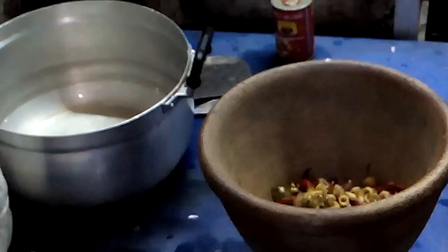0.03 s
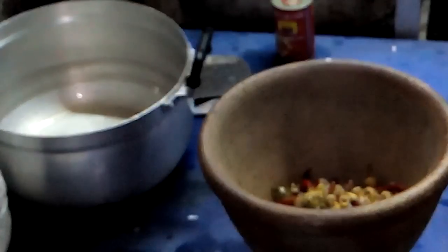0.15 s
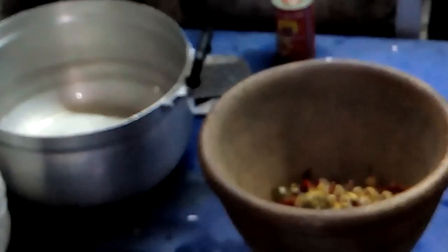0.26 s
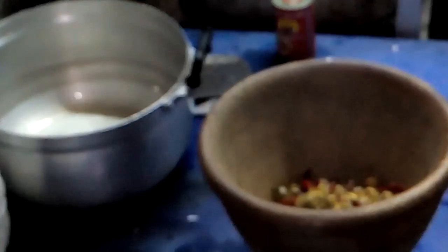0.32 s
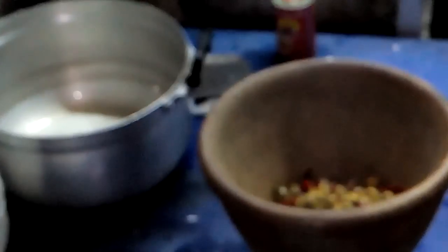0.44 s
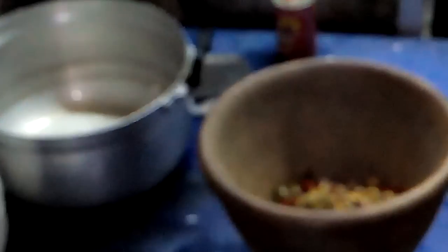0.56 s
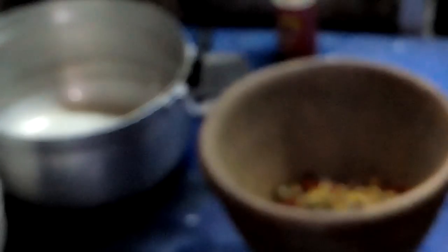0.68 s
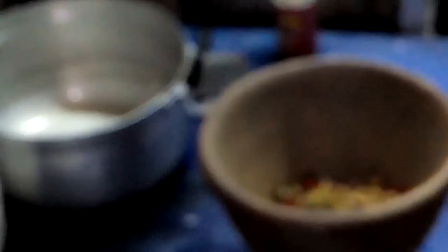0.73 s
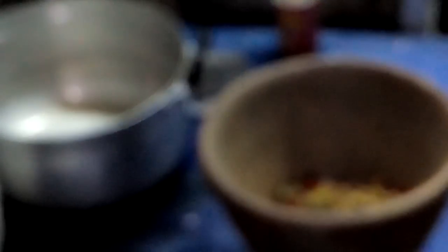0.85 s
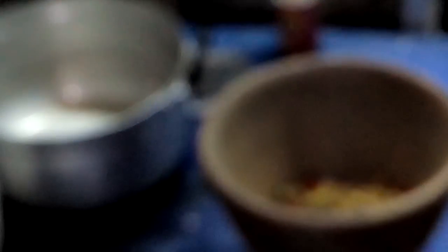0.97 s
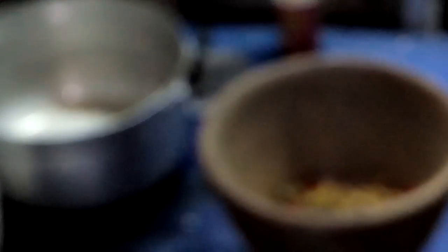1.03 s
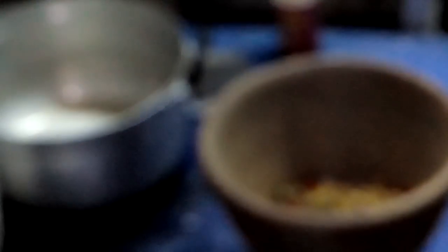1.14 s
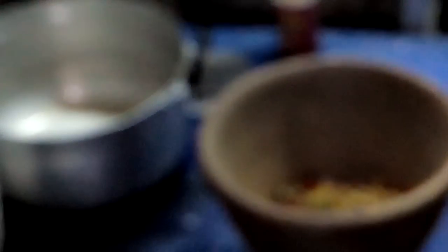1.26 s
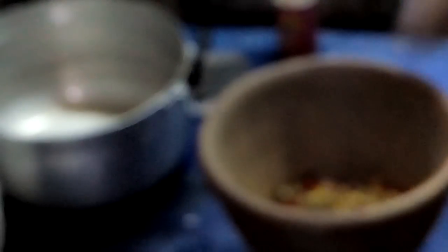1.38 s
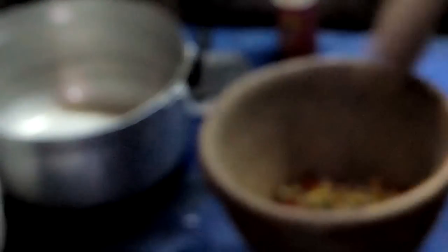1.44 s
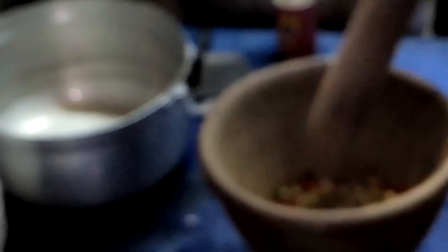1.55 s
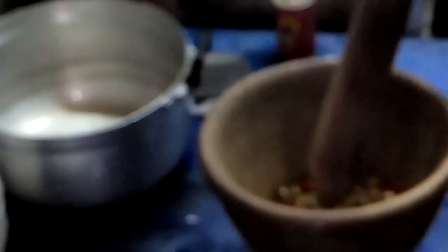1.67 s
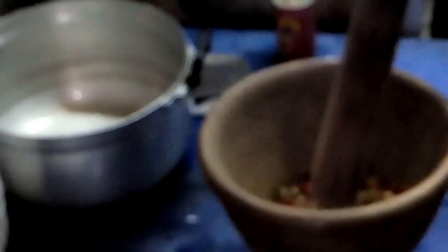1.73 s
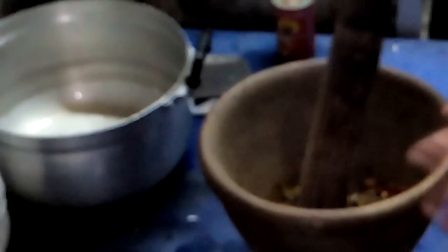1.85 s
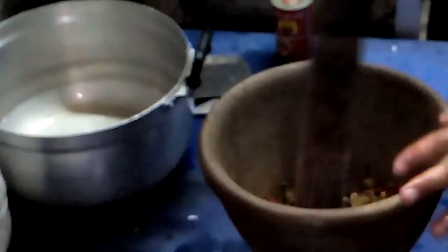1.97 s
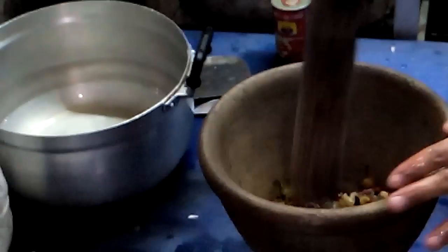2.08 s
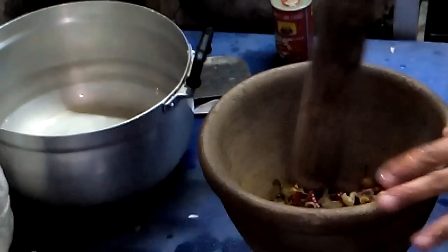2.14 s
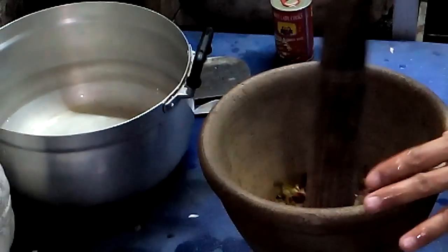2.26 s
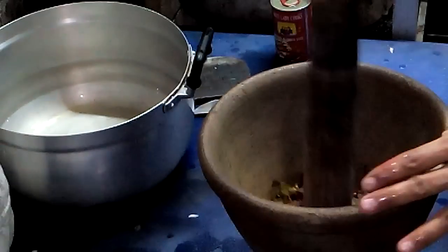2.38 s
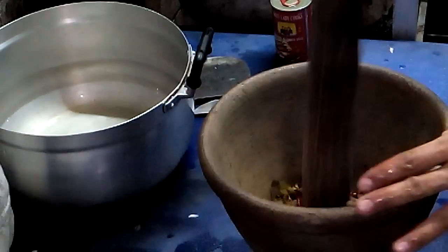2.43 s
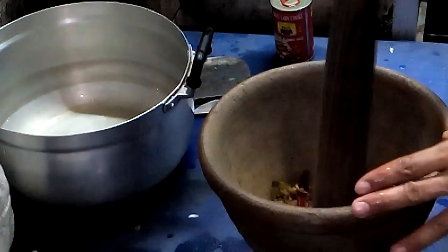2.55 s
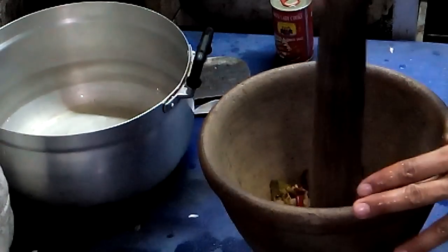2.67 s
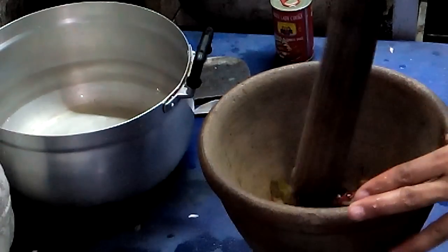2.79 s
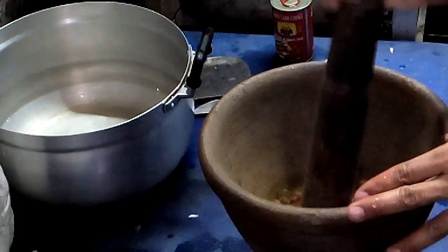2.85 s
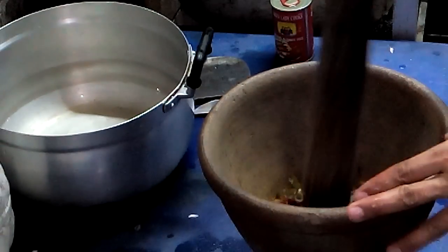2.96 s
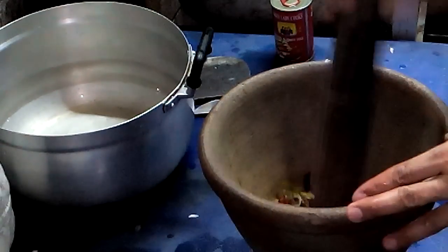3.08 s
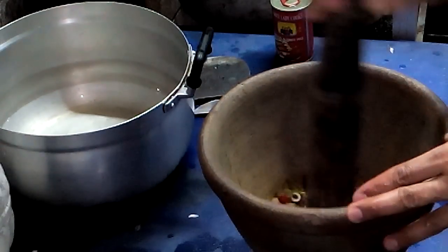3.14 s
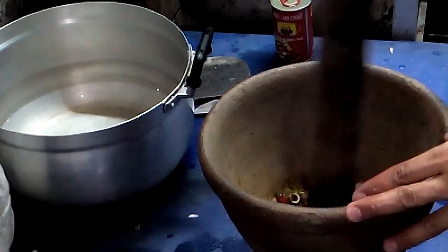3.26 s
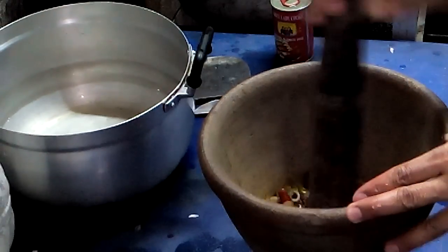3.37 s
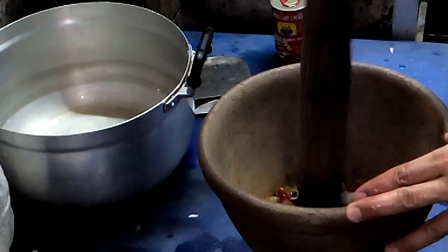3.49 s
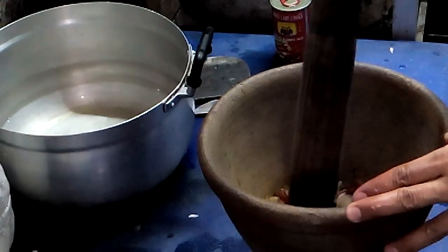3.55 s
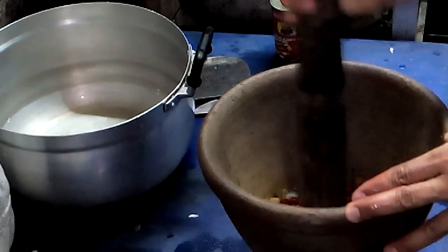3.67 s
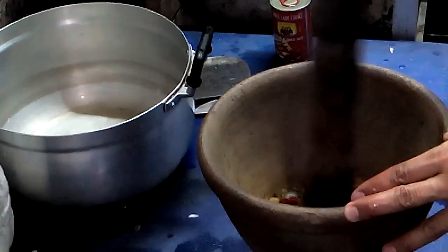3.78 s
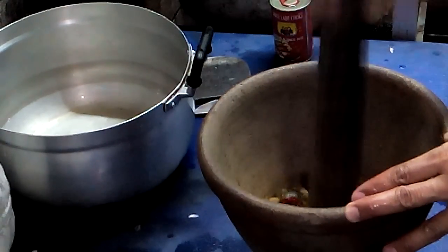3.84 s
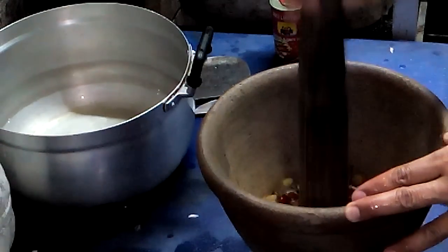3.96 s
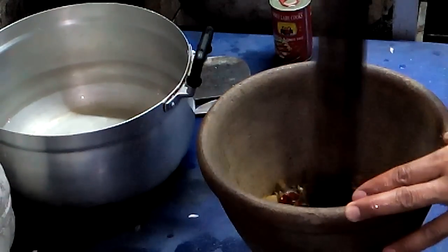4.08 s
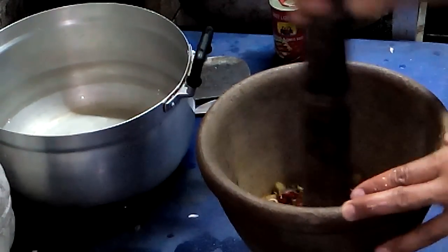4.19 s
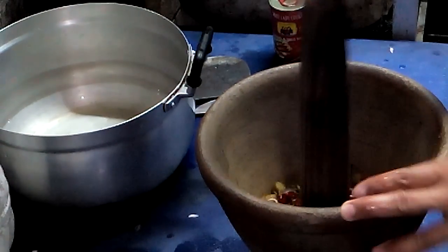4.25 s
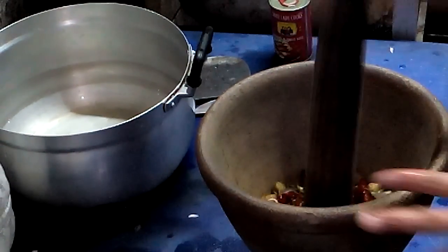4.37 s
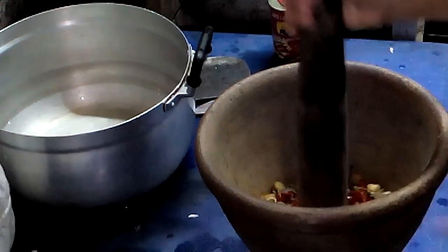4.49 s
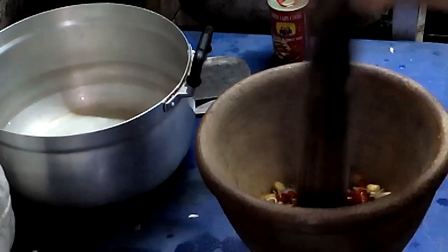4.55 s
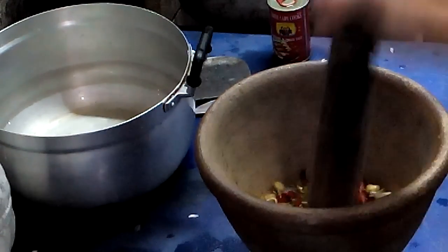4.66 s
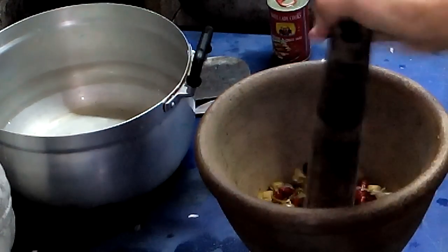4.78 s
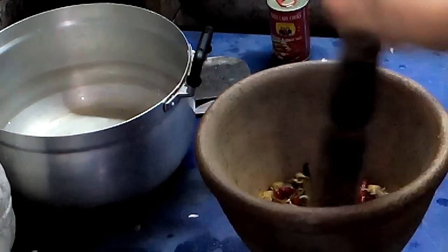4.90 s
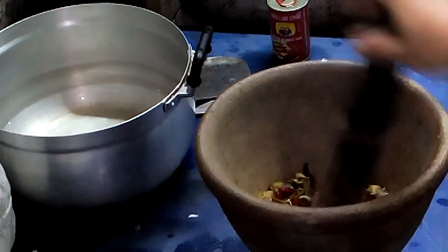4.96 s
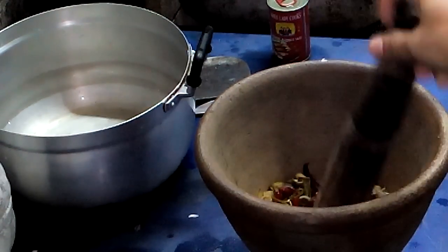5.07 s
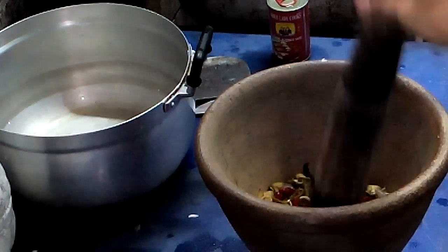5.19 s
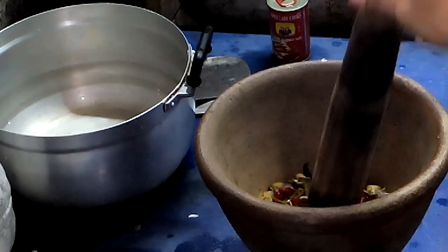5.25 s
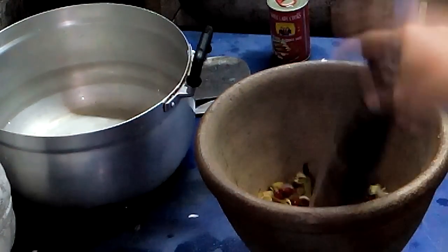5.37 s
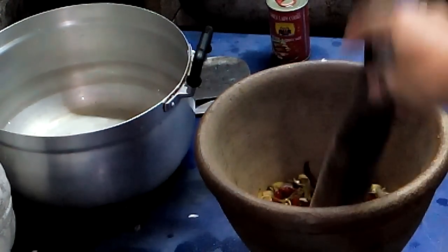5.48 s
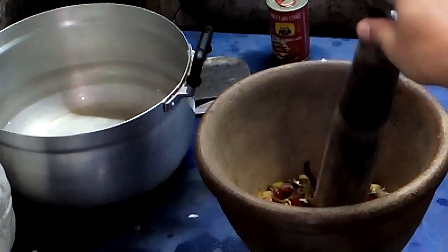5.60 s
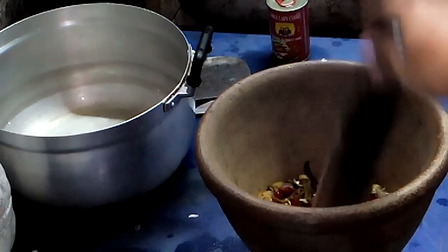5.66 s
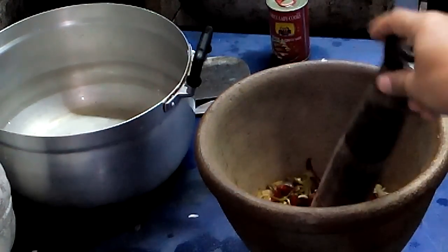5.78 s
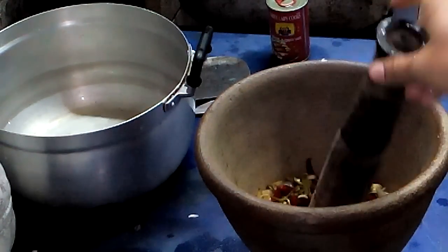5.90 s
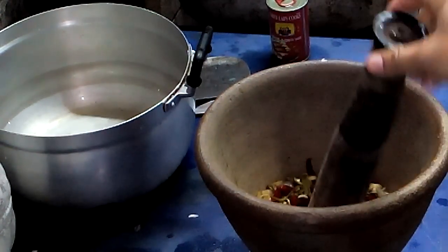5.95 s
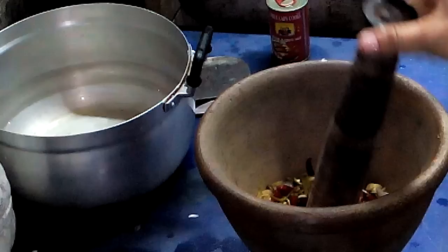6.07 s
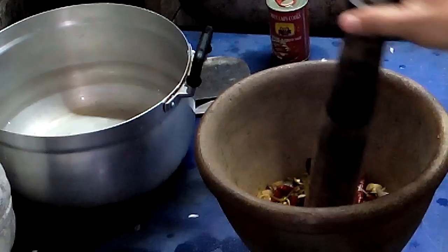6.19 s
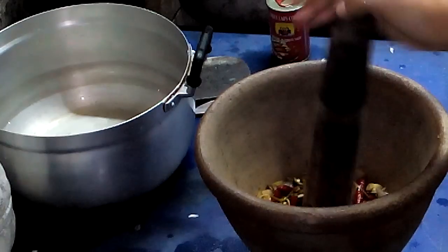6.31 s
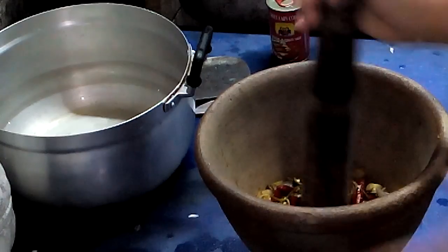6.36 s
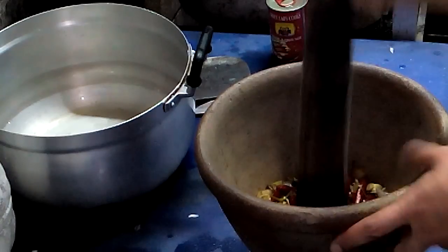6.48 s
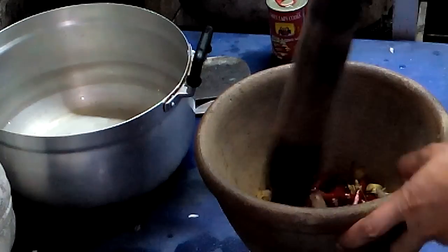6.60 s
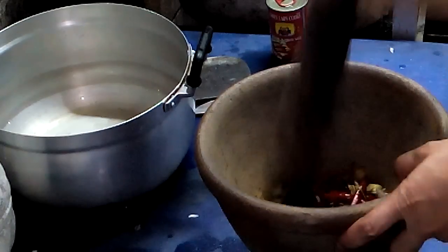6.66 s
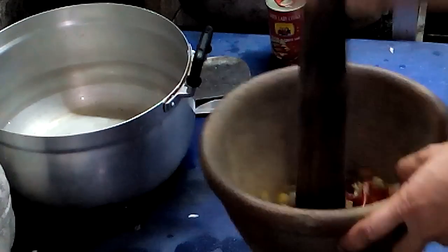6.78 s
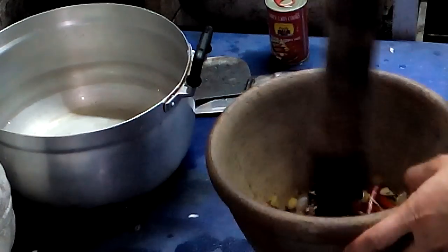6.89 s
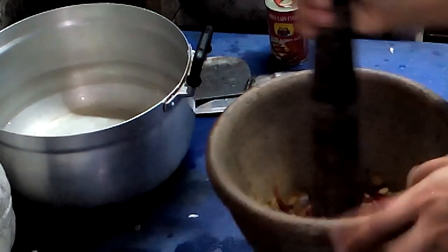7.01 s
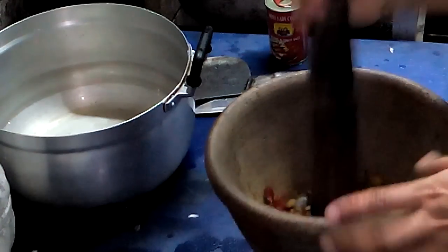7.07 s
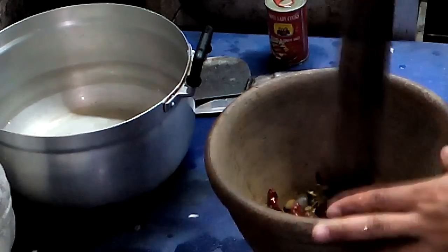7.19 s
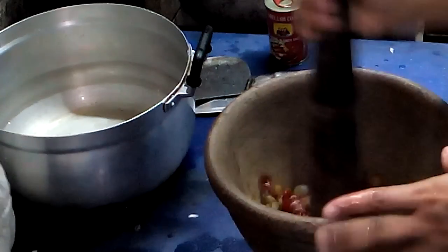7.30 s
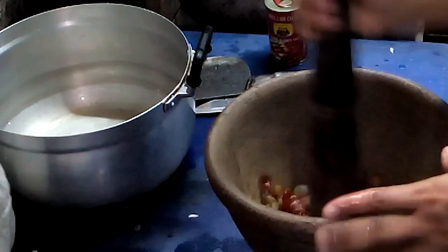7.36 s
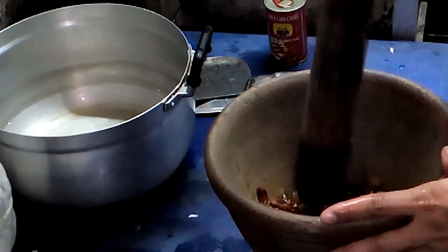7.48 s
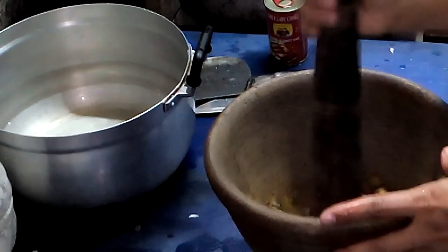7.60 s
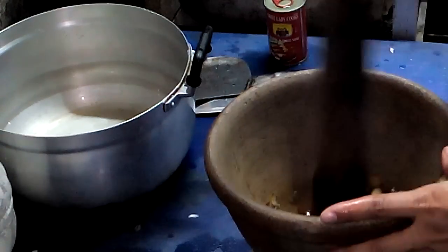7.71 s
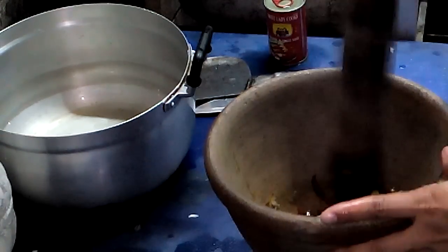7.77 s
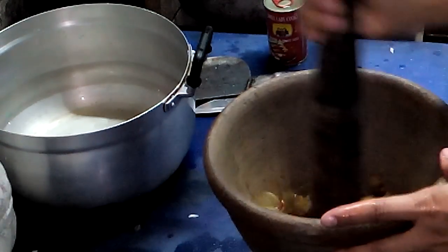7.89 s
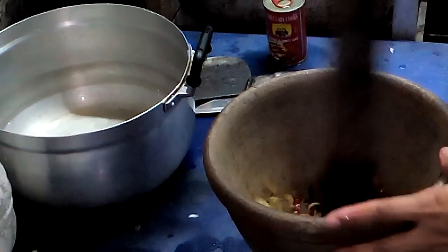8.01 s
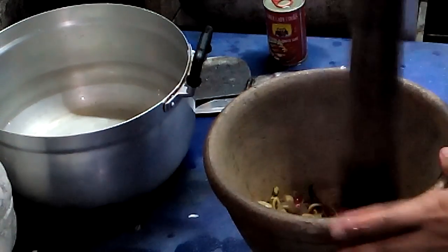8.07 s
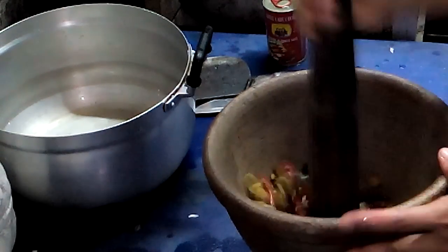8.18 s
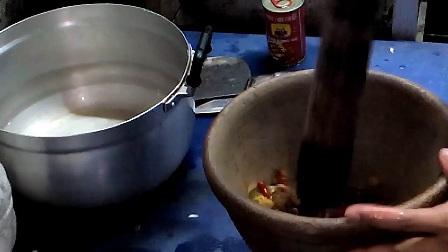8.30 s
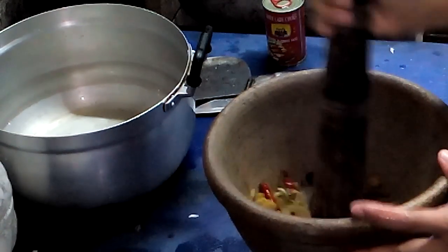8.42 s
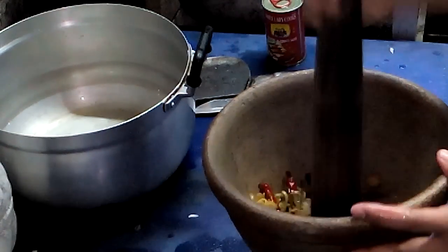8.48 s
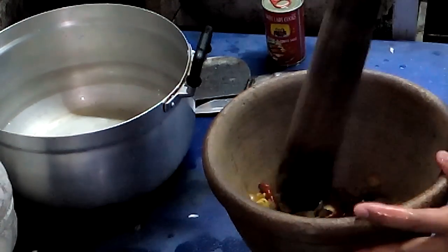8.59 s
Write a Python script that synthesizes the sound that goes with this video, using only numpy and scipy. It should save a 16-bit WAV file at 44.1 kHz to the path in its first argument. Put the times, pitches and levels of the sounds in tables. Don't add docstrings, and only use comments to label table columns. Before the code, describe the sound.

Close in a small hard kitchen with a faint low rumble. Something hollow is dragged and knocked, then a pause with a few wet ticks. A wooden pestle starts pounding moist food in a clay mortar, about four blows a second, each a crunch followed by a dull thud through bowl and table. It slows, leaving sticky smacks and faint squeals; the bowl is scraped round and pounding resumes. Small microphone, little deep bass.

```python
import sys
import numpy as np
from scipy import signal
from scipy.fft import rfft, irfft, next_fast_len
from scipy.io import wavfile
from scipy.ndimage import uniform_filter1d, map_coordinates

SR = 44100
rng = np.random.default_rng(int(sys.argv[2]) if len(sys.argv) > 2 else 0)


def log_audio(samples):
    frames = np.atleast_2d(samples).T
    limited = np.clip(frames, -1, 1)
    pcm = np.round(limited * 32767).astype(np.int16)
    wavfile.write(sys.argv[1], SR, pcm)


def boost(x):
    u = np.asarray(x, float) / 20
    return 10 ** u


N = 381200

# frequency in Hz, density in dB per Hz.
CRISP = [(710, -7), (1200, -6), (2070, -0.5), (2480, -4), (2720, -1), (4580, -5.5), (6720, -6.5),
         (7430, -11.5), (8860, -24.5), (11500, -74), (19500, -120)]
# frequency in Hz, width in Hz, level in dB.
HOLLOW = [(1245, 145, 6.5), (1460, 218, 2), (1690, 216, 2), (2090, 120, 0.5), (2530, 580, -6.5)]
# frequency in Hz, width in Hz, level in dB.
BELLY = [(248.5, 41, 0.5), (300.6, 51, 1.5), (351, 39, -1.5), (411.3, 30, -1), (430, 58, -9.5)]
WALL = [(520, 67, 6.5), (598, 59, 0.5), (656, 42, -3.5), (743, 49, 0.5)]
RIM = [(844, 60, -0.5), (968, 84, 5), (1117, 110, 2.5)]
# start in seconds, table in dB, then low boom, bowl belly and bowl wall in dB.
LAND = [(2.751, -48.5, 12, -14, -3), (3.027, -43, -11, -31, -17), (3.298, -34.5, 5, -17, -12),
        (3.559, -29.5, -1, -24, -18.5), (3.83, -38, 7, -2.5, -8), (4.09, -21.5, -11, -17, -25),
        (4.3615, -11.5, -22, -20.5, -33), (4.6398, -15, 3.5, -9.5, -14.5), (4.923, -22, -3, -22, -20.5),
        (5.15, -45.5, -11, -4, -7), (5.577, -31, 4.5, -13, -16.5), (5.916, -37, 0, -11, -33),
        (7.212, -24, -1.5, -22.5, -26), (7.492, -21.5, -5, -4, 0), (7.774, -30.5, 3, -30, -38),
        (8.047, -29.5, 4, -19, -17), (8.091, -24, -16, -11, -9), (8.334, -23, -16, -21, -23),
        (8.604, -24, -30, -16, -19)]


def unit(x):
    return x / np.sqrt(np.mean(x ** 2) + 1e-20)


def along(points, hz):
    f, v = np.transpose(points)
    return np.interp(np.log(hz + 1), np.log(f + 1), v)


def add_at(out, s, sound):
    out[round(s * SR):][:len(sound)] += sound


def filtered(x, response):
    m = next_fast_len(N + SR // 2)
    return irfft(rfft(x, m) * response(np.fft.rfftfreq(m, 1 / SR)), m)[:N]


def resonances(modes, hz):
    power = sum(boost(2 * db) * np.pi * width / SR for _, width, db in modes)
    total = 0
    for k, (centre, width, db) in enumerate(modes):
        mode = 1j * hz * width / (centre * centre - hz * hz + 1j * hz * width)
        total = total + (-1) ** k * boost(db) * mode
    return total / np.sqrt(power)


def resonant(x, modes):
    return filtered(x, lambda hz: resonances(modes, hz))


def coloured(x, spectrum):
    return unit(filtered(x, lambda hz: boost(along(spectrum, hz))))


def wobble(rate):
    return map_coordinates(rng.standard_normal(int(N * rate / SR) + 4), [np.arange(N) * rate / SR])


def grit(spread_db):
    return unit(rng.standard_normal(N) * boost(spread_db * wobble(900)))


def smeared_tone(t, hz, smear):
    drift = np.cumsum(rng.standard_normal(len(t))) * smear
    return np.sin(2 * np.pi * hz * t + drift)


def stroke(s, length, db, swell_db=0):
    grip_s, let_go_s = 0.0063, 0.025
    out, t = np.zeros(N + SR), np.arange(round((length + let_go_s) * SR)) / SR
    hold = np.clip(np.minimum(t / grip_s, 1 + (length - t) / let_go_s), 0, 1)
    add_at(out, s, hold * boost(db + swell_db * np.clip(t / length, 0, 1)))
    return out[:N]


def afterglow(db, grows, fade_s):
    power = np.zeros(N)
    for s, blow_db, *_ in LAND:
        power[round(s * SR)] = boost(2 * (db + grows * (blow_db + 18)))
    return np.sqrt(signal.lfilter([1], [1, -np.exp(-2 / (fade_s * SR))], power))


def air():
    # frequency in Hz, density in dB per Hz.
    room_air = [(13, -53.5), (22, -36.5), (49, 2.5), (99, 2), (118, -1), (152, -0.5), (190, -12), (285, -8),
                (323, -11.5), (949, -16.5), (1050, -18.5), (1530, -18), (6080, -28), (7430, -29),
                (8860, -51.5), (11500, -86.5), (19500, -120)]
    hum = filtered(rng.standard_normal(N), lambda hz: boost(along(room_air, hz)))
    rumble = unit(filtered(hum, lambda hz: 1 / (1 + (hz / 220) ** 4)))
    hiss = unit(filtered(hum, lambda hz: 1 - 1 / (1 + (hz / 220) ** 4)))
    legs = afterglow(db=-39.5, grows=0.38, fade_s=0.23)
    crumbs = afterglow(db=-57, grows=0.6, fade_s=0.24)
    low = np.hypot(boost(-54), legs) * boost(1.8 * wobble(12)) * rumble
    return low + np.hypot(boost(-57), crumbs) * boost(0.29 * wobble(4.3)) * hiss


def rubbing():
    # start in seconds, length in seconds, hiss in dB, low part in dB, swell in dB.
    strokes = [(0.032, 0.085, -58.5, 4, 0), (0.326, 0.16, -57.5, 11.5, 1), (0.492, 0.08, -53, 15.5, -2),
               (0.859, 0.05, -51, 15.5, -8.5), (1.12, 0.099, -58.5, -9, -8), (1.232, .07, -55.5, 6, -7),
               (1.537, 0.049, -61, -10, -6), (1.694, 0.083, -55, -14, 0), (2.106, 0.097, -54, 1, 4),
               (2.904, 0.089, -52, -10, -3), (3.047, 0.081, -46.5, -9, -9.5), (3.14, 0.09, -51, -15, -8),
               (7.76, .035, -44.5, 6, -2.5), (4.468, .04, -58, 16, -5), (8.272, 0.027, -58.5, 11, 11),
               (8.449, 0.033, -49.5, 10, 2.5), (8.489, 0.046, -47.5, 6.5, 2.5)]
    # time in seconds, pressure in dB.
    turning = [
        (6.58, -77),
        (6.652, -55),
        (6.674, -62.5),
        (6.736, -47.5),
        (6.931, -39.5),
        (7.036, -62),
        (7.142, -64),
        (7.15, -79),
    ]
    times, pressure_db = np.transpose(turning)
    pressure = boost(np.interp(np.arange(N) / SR, times, pressure_db))
    scrape = pressure * stroke(times[0], times[-1] - times[0], 1.5)
    push, low = scrape, scrape * boost(1)
    for s, length, db, low_db, swell_db in strokes:
        push = push + stroke(s, length, db, swell_db)
        low = low + stroke(s, length, db + low_db, swell_db)
    uneven = boost(1.3 * wobble(60))
    skin_hz = 1120
    hiss = filtered(coloured(grit(1.2), CRISP), lambda hz: (1j * hz / (skin_hz + 1j * hz)) ** 2)
    body = resonant(uneven * low * boost(-10) * grit(3.4), HOLLOW + RIM[:2])
    return uneven * push * boost(0.97) * hiss + body


def smacks():
    # start in seconds, peak in dB, pitch in Hz.
    films = [(0.0334, -38.5, 4750), (0.0615, -40, 3760), (0.068, -38, 4950), (1.9782, -38.5, 3280),
             (2.0484, -45, 7100), (2.324, -42.5, 6100), (2.344, -38, 3360), (2.3924, -37.5, 6520),
             (4.584, -41, 3480), (4.8698, -34, 4580), (5.108, -36.5, 6500), (5.246, -38.5, 4140),
             (5.363, -45, 7200), (5.5064, -40, 5480), (5.5353, -38, 5900), (5.718, -39, 5000),
             (6.0177, -32.5, 5730), (6.0794, -42.5, 4800), (6.119, -41, 4520), (6.146, -40.5, 4120),
             (6.4098, -38.5, 4340), (6.444, -40.5, 6300), (7.415, -43.5, 7100), (7.63, -55, 3200),
             (7.7164, -38, 4530), (7.8534, -41, 4850), (7.9924, -50, 4850), (8.294, -38.5, 2930),
             (8.429, -36.5, 3690)]
    out, t = np.zeros(N + SR), np.arange(SR // 20) / SR
    shape = boost(-60 * t / 0.054) * (1 - np.exp(-t / 0.0017))
    for s, db, hz in films:
        add_at(out, s, boost(db - 7) * shape * smeared_tone(t, hz, 0.31))
    return out[:N]


def rings(tones):
    out, t = np.zeros(N + SR), np.arange(SR // 2) / SR
    for s, db, hz, t60 in tones:
        rise = 1 - np.exp(-t * hz / 0.47)
        tone = smeared_tone(t, hz, 0.019 * np.sqrt(hz / 500))
        add_at(out, s, boost(db - 60 * t / t60) * rise * tone)
    return out[:N]


def knock_tones():
    # start in seconds, peak in dB, frequency in Hz, t60 in
    # seconds.
    ring_tones = [(0.258, -33, 595, 0.075), (0.394, -36, 417, 0.09), (0.495, -34, 448, 0.054),
                  (0.537, -32, 430, 0.069), (3.298, -40, 573, 0.11), (3.343, -36, 305, 0.13),
                  (3.35, -45, 1020, 0.16), (3.552, -40, 593, 0.17), (3.603, -41, 792, .1),
                  (3.852, -42, 420, .08), (4.146, -36, 520, 0.063), (4.146, -37, 368, 0.17),
                  (4.472, -44, 897, 0.08), (4.639, -12.5, 151, 0.2), (4.64, -10.5, 577, 0.055),
                  (4.648, -20.5, 520, 0.22), (4.65, -21, 290.8, .23), (4.688, -18.5, 401, 0.14),
                  (4.688, -27, 956, 0.26), (4.735, -30, 1033, 0.18), (4.742, -32, 380, .15),
                  (4.924, -30.5, 600, .12), (4.945, -32.5, 548, 0.074), (4.988, -40, 943, 0.25),
                  (4.988, -38, 1018, 0.23), (4.99, -40.5, 736, 0.12), (7.186, -42.5, 630, 0.11),
                  (7.491, -8, 584, .07), (7.491, -8, 159, 0.083), (7.497, -21, 397, 0.15),
                  (7.513, -15.5, 538.4, 0.18), (7.548, -23, 551.6, 0.14), (8.024, -42, 597, 0.11),
                  (8.087, -27, 1014, 0.1), (8.087, -30, 906, .12), (8.092, -22.5, 259, 0.087),
                  (8.1, -31.5, 743, 0.12), (8.13, -40, 995, .1), (8.366, -22.5, 152.4, 0.36),
                  (8.455, -41.5, 800, 0.096), (8.604, -14, 149, 0.22), (3.343, -30, 148, 0.14),
                  (3.588, -23.5, 147.2, .2), (4.735, -23, 149, 0.13), (4.955, -22, 150, 0.18),
                  (5.0, -26, 160, 0.073), (7.515, -20, 109.4, .3), (7.53, -17, 159, 0.13),
                  (8.048, -24, 148, .1), (7.56, -28, 398.4, 0.27),
                  (0.034, -47, 1883, 0.18), (0.255, -47, 1600, .04), (2.756, -47, 2080, 0.087),
                    (3.35, -41, 1272, 0.18), (3.352, -48, 2060, 0.32), (3.355, -46, 2850, 0.072),
                    (3.545, -35, 3410, .06), (3.606, -39, 1427, .1), (3.826, -39, 4700, 0.058),
                    (4.147, -36, 1234, .15), (4.147, -38, 2020, 0.14), (4.16, -47, 3280, 0.3),
                    (4.353, -35, 1980, 0.075), (4.356, -32.5, 2730, 0.063), (4.37, -35, 1500, 0.083),
                    (4.64, -33, 1664, .12), (4.641, -24.5, 1243, 0.089), (4.922, -32, 2084, 0.048),
                    (4.924, -40, 1367, .08), (4.99, -42, 1232, 0.13), (5.568, -38, 2130, .07),
                    (7.274, -43, 1380, 0.043), (7.491, -20.5, 1460, .13), (7.491, -19.5, 1577, 0.084),
                    (7.492, -21, 1345, .07), (7.54, -32, 1460, .08), (8.09, -43.5, 2030, .2),
                    (8.322, -43, 2143, 0.15), (8.571, -44, 1240, 0.12), (8.59, -35, 1634, 0.088),
                    (8.59, -38, 1240, 0.074)]
    return rings(ring_tones)


def squeals():
    # start in seconds, length in seconds, start pitch in Hz, end pitch in Hz, level in dB.
    glides = [
        (0.042, .035, 1882, 1910, -49.5),
        (0.062, 0.018, 1490, 1493, -58),
        (5.17, 0.37, 1245, 1260, -63),
        (5.33, .2, 2060, 2050, -64),
        (5.62, .14, 890, 900, -63),
        (5.931, 0.094, 978, 995, -52),
        (6.168, 0.049, 984, 946, -57.5),
        (5.42, 0.29, 1324, 1320, -62),
        (5.8, 0.19, 947, 968, -66),
    ]
    tones, t = np.zeros(N), np.arange(N) / SR
    waver, flicker = 1 + 0.0241 * wobble(97), boost(2.6 * wobble(30))
    for s, length, from_hz, to_hz, db in glides:
        pitch = np.interp(t, [s, s + length], [from_hz, to_hz]) * waver
        phase = 2 * np.pi * np.cumsum(pitch) / SR
        tones += stroke(s, length, db) * flicker * np.sin(phase)
    return tones


def dragging():
    # start in seconds, length in seconds, drone in dB, rasp in dB, swell in dB.
    jerks = [
        (0.232, 0.14, -49, -8.5, -3),
        (0.385, 0.068, -48.5, -17, -5),
        (0.489, 0.095, -47, -3, -0.5),
    ]
    # start in seconds, level in dB, rasp in dB, length in seconds, note in Hz.
    knocks = [
        (0.256, -34, -11.5, 0.013, 586),
        (0.854, -25.5, -13.5, 0.0096, 420),
    ]
    # frequency in Hz, width in Hz, level in dB.
    box = [(335, 86, -6.5), (423, 58, 3), (538, 51, -1.5), (710, 65, -9)]
    t, uneven = np.arange(N) / SR, boost(1.7 * wobble(48))
    slips, rasp, notes = np.zeros(N), np.zeros(N), np.zeros(N)
    for s, length, db, rasp_db, swell_db in jerks:
        slips += uneven * stroke(s, length, db, swell_db)
        rasp += uneven * stroke(s, length, db + rasp_db)
    for s, db, rasp_db, length, hz in knocks:
        since = t - s - 0.004
        blow = boost(db - 0.5) * np.exp(-np.abs(since) / np.where(since > 0, length, 0.0015))
        notes += resonant(blow * grit(4.6), [(hz, 110, 0), (0.97 * hz, 110, -6)])
        rasp += blow * boost(rasp_db)
    return notes + resonant(slips * grit(1.3), box) + resonant(rasp * grit(3), HOLLOW[1:] + RIM)


def further_tones():
    # start in seconds, peak in dB, frequency in Hz, t60 in seconds.
    short_tones = [(0.259, -38, 725, 0.056), (0.3, -45, 690, .1), (0.418, -36, 430, .07),
                   (0.446, -41, 420, .07), (0.51, -33, 450, 0.065), (0.566, -41, 440, .06),
                   (0.858, -37.5, 642, 0.087), (0.858, -45, 1550, .07), (3.6, -36.5, 301, .12),
                   (4.112, -38, 420, .08), (4.148, -31, 294, .12), (4.48, -37, 300, 0.11),
                   (4.41, -36, 400, .1), (4.664, -24, 560, .1), (4.668, -20, 200, .08),
                   (4.7, -30, 1245, .08), (5.912, -38, 206, .12), (5.93, -42, 290, .08),
                   (6.222, -45, 2100, 0.046), (7.275, -45.5, 1000, 0.044), (8.075, -29.5, 391, .1),
                   (8.12, -32, 450, .1), (8.16, -39, 1150, .06), (8.372, -40, 520, .08),
                   (8.571, -42, 800, .05)]
    return rings(short_tones)


def crunch():
    # start in seconds, peak in dB, hollow part in dB, t60 in seconds.
    crushes = [(2.4763, -31.5, -4.5, 0.16), (2.757, -31, 7.5, 0.053), (3.021, -26.5, -23, 0.074),
               (3.29, -26, 0.5, 0.052), (3.547, -29.5, -1, 0.068), (3.807, -35, 6.5, 0.14),
               (4.0783, -29, 1, 0.067), (4.356, -30.5, 6, .071), (4.642, -26, 3, 0.07),
               (4.923, -24.5, -2, 0.055), (5.568, -33.5, 4, 0.072), (5.896, -33, -7, 0.062),
               (7.173, -41.5, 9.5, 0.096), (7.191, -36.5, -7, 0.14), (7.47, -31.5, 5, 0.18),
               (7.562, -42.5, 6, 0.13), (7.736, -35, -5.5, 0.2), (8.02, -32, 4.5, 0.14),
               (8.0407, -34, -15, 0.21), (8.319, -30, 0.5, 0.091), (8.575, -36.5, 4.5, 0.15),
               (3.345, -38.5, 0, 0.098), (4.148, -31, -2, 0.1), (4.72, -38, 9, 0.073)]
    # start in
    # seconds, peak in dB, hollow part in dB.
    snaps = [(3.286, -37, 7), (2.755, -38, 7), (3.546, -38, 6), (3.808, -41, 5), (4.074, -36, 6),
             (4.921, -34, -1), (8.571, -39, 3), (3.601, -40.5, 9), (3.826, -36.5, -4), (4.633, -34, 7),
             (4.685, -28, -1), (4.714, -39.5, 0), (4.737, -40.5, 15.5), (5.157, -45, 5), (5.654, -42.5, -9),
             (6.223, -32, -32), (7.274, -38.5, 2.5), (7.49, -32.5, -5.5), (7.531, -31.5, 7),
             (8.089, -29, 9.5), (8.595, -34.5, 1)]
    bites = [(*row, 0.0054) for row in crushes]
    bites += [(*row, 0.099, 0.0012) for row in snaps]
    bright, dull = np.zeros(N + SR), np.zeros(N + SR)
    t = np.arange(-SR // 20, SR // 2) / SR
    for s, db, hollow_db, t60, rise in bites:
        shape = boost(-60 * np.maximum(t, 0) / t60) / (1 + np.exp(np.minimum(1 - t / rise, 50)))
        shape /= shape.max()
        add_at(bright, s - 0.05, boost(db - 7.5) * shape)
        add_at(dull, s - 0.05, boost(db + min(hollow_db, 9) - 11.5) * shape)
    clumps = boost(2.2 * wobble(120))
    fibres = clumps * bright[:N] * coloured(grit(3.74), CRISP)
    return fibres + resonant(clumps * dull[:N] * grit(2.6), HOLLOW)


def patchy(x):
    z = signal.stft(x, nperseg=256)[2]
    field = rng.standard_normal(z.shape)
    field = uniform_filter1d(field, round(350 * 256 / SR), axis=0)
    field = uniform_filter1d(field, round(0.012 * SR / 128), axis=1)
    gain = boost(2.2 * unit(field))
    return signal.istft(z * unit(gain), nperseg=256)[1][:N]


def bursts():
    # start in seconds, peak in dB, pitch in Hz.
    pockets = [(2.48, -37, 1650), (2.754, -33.5, 1230), (3.289, -21, 2150), (3.289, -24, 2750),
               (3.553, -28, 2640), (3.81, -38, 1240), (3.826, -26.5, 2120), (4.074, -26, 1225),
               (4.353, -27, 1280), (4.923, -37.5, 3370), (5.569, -29.5, 1405), (5.568, -27.5, 1690),
               (5.898, -35, 2693), (6.842, -32, 767), (7.189, -37, 1355), (8.021, -36, 1256),
               (8.321, -29.5, 1290)]
    out, t = np.zeros(N + SR), np.arange(SR // 10) / SR
    shape = boost(-60 * t / 0.044) * (1 - np.exp(-t / 0.0018))
    for s, db, hz in pockets:
        add_at(out, s, boost(db) * shape * smeared_tone(t, hz, 0.1))
    return out[:N]


def table_top(hz):
    # frequency in Hz, width in Hz, level in dB.
    top_modes = [(149, 12, 0), (193, 22, -7)]
    centre_hz, width_hz = 151, 144
    band = 1j * hz * width_hz / (centre_hz ** 2 - hz * hz + 1j * hz * width_hz)
    return resonances(top_modes, hz) * band


def table_legs(hz):
    # frequency in Hz, width in Hz, level in dB.
    low_modes = [(59.5, 17.3, -3), (110.6, 6.5, 7.5)]
    return resonances(low_modes, hz) * (1j * hz / (44 + 1j * hz)) ** 2


def thuds():
    # start in seconds, table in dB, low boom in dB, bowl in dB.
    rocking = [(3.349, -30, -3, -6), (3.597, -25, -11.5, -10.5), (3.853, -38, 4.5, -2.5),
               (4.113, -22, 1.5, -10.5), (4.145, -26, -1.5, -6), (4.665, -16, -24, -7.5),
               (4.704, -11, -31, -16.5), (4.74, -34, -10.5, 2), (4.962, -25.5, -26, -13.5),
               (4.994, -30, -14, -7), (5.613, -33, 5.5, -12), (7.038, -39.5, -32, -7),
               (7.243, -30.5, -2, -19.5), (7.277, -43, -6, -20), (7.52, -17.5, -10, -11),
               (7.549, -29, 8, -7.5), (7.799, -27, -18, -17), (7.898, -39, -11, -12.5),
               (8.074, -24, 2.5, -7), (8.115, -27.5, -22, -11), (8.362, -30, -23, -15),
               (8.385, -24, -21, -18.5), ]
    # start in seconds, peak in dB.
    clacks = [
        (3.608, -46.5),
        (4.145, -50),
        (4.6385, -24),
        (4.7209, -32.5),
        (7.4907, -14.5),
        (7.5294, -45),
        (8.088, -31.5),
    ]
    # frequency in Hz, width in Hz, level in dB.
    club = [(1330, 88, 3), (1490, 50, 4), (1498, 110, 6), (1664, 100, -1)]
    spike = [(641, 143, -1.5), (1533, 160, -2.5)]
    table, bowl, t = np.zeros(N + SR), np.zeros(N + SR), np.arange(2 ** 13) / SR
    hz = np.fft.rfftfreq(len(t), 1 / SR)
    blunt = 1 / (1 - (hz / 1850) ** 2 + 1.1j * hz / 1850) ** 3
    legs, top = table_legs(hz), table_top(hz)
    push = -np.exp(-((t - 0.004) / 0.0021) ** 2)

    def struck(modes):
        return resonances([(c, w, db + 2.3 * rng.standard_normal()) for c, w, db in modes], hz)

    contacts = [(*row, row[-1] - 2) for row in LAND]
    contacts += [(*row, row[-1] - 7.5, row[-1] - 6) for row in rocking]
    for s, db, boom_db, belly_db, wall_db, rim_db in contacts:
        rattle = rng.standard_normal(len(t)) * np.exp(-t / 0.016)
        sway = rfft(0.3 * push + rattle) * (boost(boom_db - 2.5) * legs + boost(-2) * top)
        rattle[0] = -20
        clay = boost(belly_db + 2) * struck(BELLY) + boost(wall_db) * struck(WALL)
        clay = clay + boost(rim_db - 6) * struck(RIM)
        add_at(table, s - 0.007, boost(db) * irfft(sway * blunt))
        add_at(bowl, s, boost(db) * irfft(rfft(rattle) * clay * blunt))
    bare = resonances(club, hz) + boost(2) * resonances(spike, hz)
    for s, db in clacks:
        tap = rng.standard_normal(len(t)) * 0.41 * np.exp(-t / 0.0023)
        tap[0] = -20
        add_at(bowl, s, boost(db - 5) * irfft(rfft(tap) * bare * blunt))
    return table[:N] + shudder(), bowl[:N]


def shudder():
    # start in seconds, length in seconds, table in dB, swell in dB, bowl share in dB.
    presses = [(3.299, 0.088, -32.5, -10.5, -1), (3.553, 0.073, -38, 4, -6), (3.83, 0.1, -41.5, -1.5, -5),
               (4.085, 0.082, -26.5, 1, -11.5), (4.36, 0.11, -34.5, -1.5, -4), (4.64, 0.105, -20, -3.5, -1),
               (4.925, 0.1, -31, -0.5, -12), (5.577, 0.127, -39.5, -7, -10), (5.896, 0.072, -46.5, -9, -8),
               (6.502, 0.24, -49.5, -8, -4.5), (6.858, 0.28, -42.5, 0, -7.5), (7.21, 0.061, -28, -9, -23),
               (7.491, 0.14, -22, -20, 1.5), (7.774, .045, -34.5, 0.5, -14), (8.053, 0.12, -36, -9, -8),
               (8.293, 0.11, -33.5, -5, -6), (8.584, 0.045, -22, -9, -13)]
    chatter = boost(-1 + 1.2 * wobble(45)) * grit(1.5)
    foot, clay = np.zeros(N), np.zeros(N)
    for s, length, db, swell_db, bowl_db in presses:
        press = chatter * stroke(s, length, db, swell_db)
        foot += press
        clay += boost(bowl_db) * press
    wood = filtered(foot, lambda hz: table_top(hz) + boost(-2) * table_legs(hz))
    return wood + filtered(clay, lambda hz: resonances(BELLY + WALL + RIM, hz) / (1 + 1j * hz / 600))


def kitchen(x):
    # frequency in Hz, t60 in seconds.
    decay = [(100, 0.47), (500, 0.29), (2000, 0.35), (7000, 0.25)]
    hz, t, z = signal.stft(rng.standard_normal(SR // 2), SR, nperseg=256)
    tail = signal.istft(z * boost(-60 * t / along(decay, hz)[:, None]), SR, nperseg=256)[1]
    late = np.pad(x, (250, 0))
    return signal.fftconvolve(late, tail / np.linalg.norm(tail))[:N]


def scene():
    far = air() + squeals()
    small = rubbing() + smacks() + dragging()
    tones, late = knock_tones(), further_tones()
    food, pops = crunch(), bursts()
    table, bowl = thuds()
    food = patchy(food + boost(-4.5) * kitchen(food))
    wet = boost(-15.5) * kitchen(table) + boost(-2.5) * kitchen(bowl)
    wet += boost(-8) * kitchen(small + 0.5 * pops) + boost(-9.5) * kitchen(tones)
    return (far + small + tones + late + food + pops + table + bowl + wet)[None]


def low_pass(x):
    return signal.sosfilt(signal.butter(12, 9010, fs=SR, output="sos"), x)


def record(dry):
    held = dry[0] / (1 + np.abs(dry[0] / 1.1) ** 6) ** (1 / 6)
    mix = filtered(held, lambda hz: 1 / (1 + (30 / (hz + 1)) ** 4) / (1 + (hz / 8260) ** 24))
    return low_pass(mix[None])


dry = scene()
out = record(dry)
log_audio(out)
```